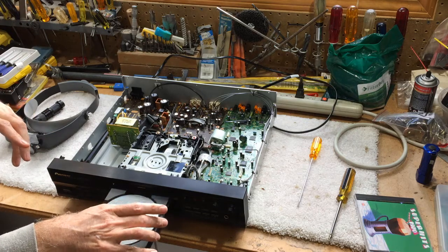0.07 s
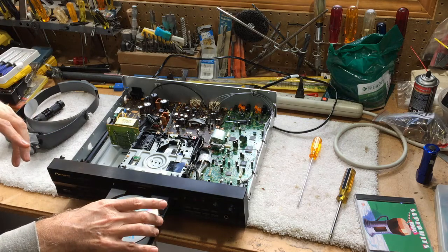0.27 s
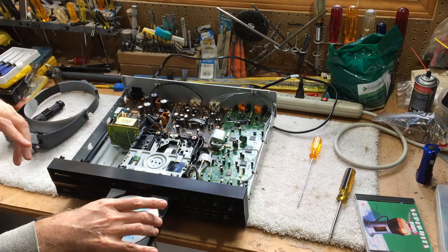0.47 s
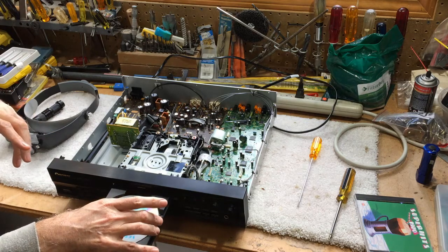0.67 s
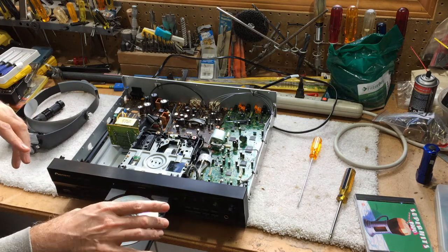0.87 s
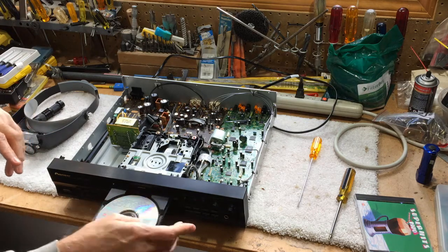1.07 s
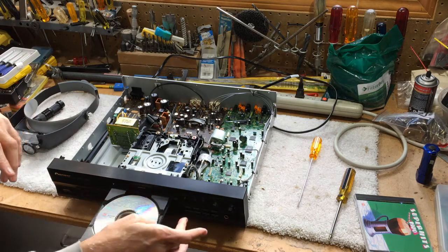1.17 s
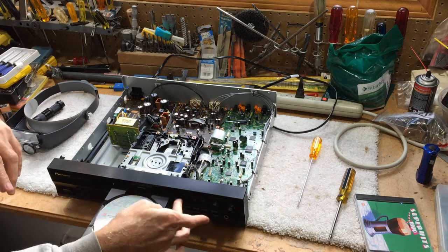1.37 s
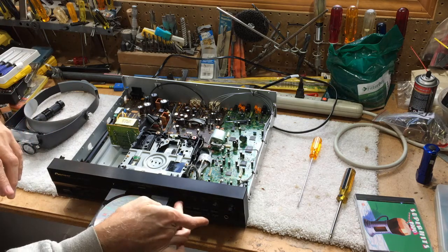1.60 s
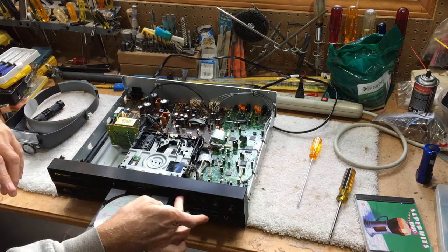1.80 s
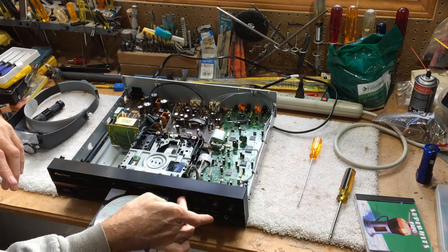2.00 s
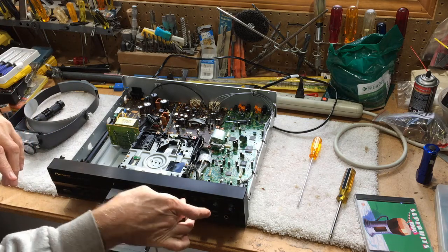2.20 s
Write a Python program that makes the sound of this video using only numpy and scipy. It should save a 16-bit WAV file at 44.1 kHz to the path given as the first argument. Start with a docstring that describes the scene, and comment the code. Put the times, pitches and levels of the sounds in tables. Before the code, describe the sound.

A disc drops into a player's plastic tray with a sharp clatter and is nudged lightly. A hand bumps the case dully, then a button clicks. Heard close in a small, quiet workshop with faint hum.

```python
"""Loading a disc player

A compact disc is set into the plastic tray of an opened player on a workbench: it grazes the rim, drops
in with a sharp clatter and is nudged a few times, each touch exciting its bending modes. A hand bumps
the case, fingers brush the panel and a button clicks. Mains hum and faint hiss fill the small workshop."""
import sys
import numpy as np
from scipy import signal
from scipy.fft import rfft, irfft, next_fast_len
from scipy.io import wavfile

SR = 44100
rng = np.random.default_rng(int(sys.argv[2]) if len(sys.argv) > 2 else 0)


def int16_out(signal):
    """Quantize to a 16-bit WAV file."""
    q = np.round(np.clip(np.atleast_2d(signal).T, -1, 1) * 32767)
    wavfile.write(sys.argv[1], SR, q.astype(np.int16))


N = 99225

# bending modes of the disc: f/Hz, level/dB, T60/s
DISC_MODES = [(252, -17, .25), (672, -8, .22), (970, 0, .18), (1012, -1.5, .2), (1445, -8, .19),
              (2100, -11, .16), (2263, -13, .18), (2316, -13, .19), (2610, -12, .21), (2835, -9, .18),
              (3750, -9, .17), (3905, -9, .17), (4184, -7, .16), (7535, -15, .15)]
DISC_LINEWIDTH_HZ = 3.1  # the disc lies loose in its well, which blurs its modes
# spectrum of rubbing on plastic: f/Hz, relative density/dB
FRICTION_SPECTRUM = [(200, -27), (700, 1), (1300, -3.5), (2700, 1), (4500, -11), (8000, -16), (15000, -31)]


def disc_drop():
    """Impact excitation: the disc skids in, each contact cracks and rattles the tray, the disc rings."""
    # contacts with the tray: t/s, level/dB
    contacts = [(.222, -44), (0.2255, -51), (.2297, -25), (.2362, -38.5), (.2437, -31), (0.268, -37)]
    # spectrum of the plastic rattle: f/Hz, relative density/dB
    rattle_spectrum = [(100, -29), (250, -16.5), (420, -20.5), (800, -10.5), (1150, -9), (1400, -4.5),
                       (1900, -7), (2600, -3), (3100, -8), (3600, -2.5), (4250, 2.5), (4900, -11),
                       (5650, 1), (6700, -4.5), (8200, -8.5), (9700, -8.5), (10600, -18.5), (11500, -12.5),
                       (15500, -15.5)]
    # decay of the rattle: f/Hz, T60/s
    rattle_decay = [(300, 0.25), (2000, 0.22), (6000, 0.078), (14000, 0.12)]
    t = clock()
    until_landing = .2297 - np.arange(N) / SR
    skid_swell = fade(abs(until_landing), t60=.017) * (until_landing > 0)
    out = amp(-33) * noise(rattle_spectrum, N) * skid_swell
    for start, db in contacts:
        crack = amp(-4.5) * noise(rattle_spectrum, len(t)) * fade(t, t60=.0062)
        add(out, start, amp(db) * (crack + burst(rattle_spectrum, rattle_decay)))
    build_up = 1 - np.exp(-t / .018)
    add(out, .2275, amp(-26) * ring(DISC_MODES, DISC_LINEWIDTH_HZ) * build_up)
    return signal.sosfilt(signal.butter(2, 168, "highpass", fs=SR, output="sos"), out)


def disc_grazes():
    """Frictional excitation: grazing swells the disc's modes near one pitch; a fingertip damps them."""
    # grazes on the tray: t/s, rise/s, centre f/Hz, roll-off/(dB/octave), ring level/dB, scrape level/dB
    grazes = [(.001, 0.0025, 1020, 13, -52, -50), (0.097, 0.01, 1050, 11, -42, -60),
              (.122, 0.0038, 1020, 13, -52, -64), (0.206, .015, 1000, 13, -51, -58.5),
              (.355, 0.018, 1020, 20, -49, -61), (.46, 0.016, 1230, 12.5, -44, -62),
              (0.645, 0.0024, 1060, 15, -60, -64), (.655, 0.0074, 658, 40, -48, -67),
              (.83, 0.0095, 970, 20, -58, -71), (.879, 0.0061, 1030, 10, -51, -61.5),
              (.903, 0.0039, 664, 40, -53, -71)]
    out, t = np.zeros(N), clock()
    for start, rise, centre_hz, rolloff, ring_db, scrape_db in grazes:
        modes = [(hz, db - rolloff * abs(np.log2(hz / centre_hz)), t60) for hz, db, t60 in DISC_MODES]
        tone = amp(ring_db) * ring(modes, DISC_LINEWIDTH_HZ) * swell(t, rise, t60=.1)
        scrape = amp(scrape_db) * noise(FRICTION_SPECTRUM, len(t)) * swell(t, rise, t60=.11)
        add(out, start, tone + scrape)
    return out


def hand_bumps():
    """Soft impact: a yielding hand imparts little treble, so the case gives a thud and a dull knock."""
    # blows on the case: t/s, thud level/dB, knock level/dB
    blows = [(1.0014, -40, -39.5), (1.0064, -46.5, -50), (1.0624, -45, -52)]
    # modes of the case: f/Hz, level/dB, T60/s
    case_modes = [(232, -0.5, 0.099), (263.5, 1.5, 0.076), (351, -2.5, 0.039), (728, -9.5, 0.12)]
    # spectrum of the knock: f/Hz, relative density/dB
    knock_spectrum = [(80, -27), (200, -3.5), (500, -2.5), (900, -1), (1450, -3.5), (1850, -9.5),
                      (2400, -31), (5000, -50)]
    # decay of the knock: f/Hz, T60/s
    knock_decay = [(200, 0.21), (1500, 0.11)]
    out, t = np.zeros(N), clock()
    thud = sum(amp(db) * fade(t, t60) * np.sin(2 * np.pi * hz * t) for hz, db, t60 in case_modes)
    for start, thud_db, knock_db in blows:
        knock = burst(knock_spectrum, knock_decay) * (1 - np.exp(-t / .00068))
        add(out, start, amp(thud_db) * thud + amp(knock_db) * knock)
    return signal.sosfilt(signal.butter(4, [149, 2090], "bandpass", fs=SR, output="sos"), out)


def button_click():
    """Impulse response: the button snaps, then bottoms out, and each bright click rings its cap."""
    # snap and end stop: t/s, level/dB
    clicks = [(2.0994, -41), (2.1055, -51)]
    # spectrum of a click: f/Hz, relative density/dB
    snap_spectrum = [(150, -17.5), (900, -22.5), (1800, -14.5), (2250, -7.5), (2900, 3), (3300, -11),
                     (3650, -2.5), (4600, -1.5), (5200, -18), (6400, -21.5), (7300, -10), (8200, -25),
                     (10200, -25), (12200, -10), (15500, -23)]
    # decay of a click: f/Hz, T60/s
    snap_decay = [(500, 0.27), (3000, 0.084), (12000, 0.054)]
    # modes of the cap: f/Hz, level/dB, T60/s
    cap_modes = [(2170, -3, .055), (2770, -1, 0.12), (3030, -1, 0.12), (3600, 3.5, 0.078), (4470, -8, 0.04),
                 (5580, 2.5, .035), (7250, -2, .03)]
    out = np.zeros(N)
    for start, db in clicks:
        snap = burst(snap_spectrum, snap_decay)
        cap = amp(-11) * ring(cap_modes, linewidth_hz=11)
        add(out, start, amp(db) * (snap + cap))
    return out


def finger_brushes():
    """Sliding friction: skin on the plastic front panel makes faint puffs of noise."""
    # touches on the panel: t/s, level/dB
    touches = [(1.845, -64), (2.043, -65.5), (2.09, -61)]
    out, t = np.zeros(N), clock()
    for start, db in touches:
        add(out, start, amp(db) * noise(FRICTION_SPECTRUM, len(t)) * swell(t, rise=.0037, t60=.08))
    return out


def workshop_reverb(x):
    """Reverberation: convolution with a short noise tail gives the cluttered room's diffuse field."""
    # reverberation time: f/Hz, T60/s
    room_decay = [(200, 0.34), (1500, 0.34), (4500, 0.38), (8000, 0.33), (14000, 0.16)]
    tail = burst([(100, .0039), (10000, 0)], room_decay)  # starts almost white
    reflections = signal.fftconvolve(x, tail / np.linalg.norm(tail))
    out = np.zeros(N)
    add(out, start=.012, sound=reflections[:N])
    return out


def background():
    """Line and continuous spectra: steady mains hum over the hiss of quiet room air."""
    # tones of the hum: f/Hz, rms level/dB
    tones = [(120, -66), (240, -84.5), (364, -80.5), (1021, -78)]
    # spectrum of the air: f/Hz, relative density/dB
    air_spectrum = [(20, -34), (35, -21.5), (60, -11.5), (100, -11), (150, -13), (207, -14), (318, -17.5),
                    (488, -18.5), (769, -21.5), (1030, -23), (1600, -24), (4000, -29), (8000, -34),
                    (15000, -39)]
    t = np.arange(N) / SR
    hum = sum(np.sqrt(2) * amp(db) * np.sin(2 * np.pi * (hz * t + rng.random())) for hz, db in tones)
    return hum + amp(-65.5) * noise(air_spectrum, N)


def ring(modes, linewidth_hz):
    """Modal superposition: damped sines of slightly random strength, broadened by phase diffusion."""
    t = clock()
    out = np.zeros(len(t))
    for k, (hz, db, t60) in enumerate(modes):
        gain = (-1) ** k * amp(db + rng.normal())
        drift = np.cumsum(rng.standard_normal(len(t))) * np.sqrt(2 * np.pi * linewidth_hz / SR)
        out += gain * fade(t, t60) * np.sin(2 * np.pi * hz * t + drift)
    return out


def burst(spectrum, decay):
    """Modal overlap: crowded modes merge into noise, each band dying at its own rate."""
    hz, t, bands = signal.stft(noise(spectrum, SR // 2), SR, nperseg=256)
    damped = bands * fade(t, along(decay, hz)[:, None])
    return signal.istft(damped, SR)[1][:SR // 2]


def noise(spectrum, size):
    """Spectral shaping: white noise is coloured, then scaled to rms 1."""
    gain = amp(along(spectrum, np.fft.rfftfreq(size, 1 / SR)))
    coloured = irfft(rfft(rng.standard_normal(size)) * gain, size)
    return coloured / np.sqrt(np.mean(coloured ** 2) + 1e-20)


def swell(t, rise, t60):
    """Linear growth for rise seconds, then free decay."""
    return np.minimum(t / rise, 1) * fade(np.maximum(t - rise, 0), t60)


def fade(t, t60):
    """Exponential decay by 60 dB in t60 seconds."""
    return amp(-60 * t / np.maximum(t60, 1e-3))


def amp(db):
    """Decibels to amplitude ratio."""
    return 10 ** (np.asarray(db) / 20)


def along(points, hz):
    """Interpolation of (f/Hz, value) points on a logarithmic frequency axis."""
    f, values = np.transpose(points)
    return np.interp(np.log(hz + 1), np.log(f + 1), values)


def clock():
    """Time axis of one half-second event."""
    return np.arange(SR // 2) / SR


def add(track, start, sound):
    """Superpose a sound on the track at start seconds."""
    i = max(0, round(start * SR))
    track[i:i + len(sound)] += sound[:N - i]


def scene():
    """Superposition: direct handling sounds, their reverberation and the background, in mono."""
    disc = disc_drop() + disc_grazes()
    thuds = hand_bumps()
    panel = button_click() + finger_brushes()
    reverb = workshop_reverb(amp(-10.5) * disc + amp(-12) * thuds + amp(-16) * panel)
    return (disc + thuds + panel + reverb + background())[None]


def record(dry):
    """Band limiting: an ideal low-pass removes everything above 15.8 kHz."""
    size = next_fast_len(N + SR // 2)
    passband = np.fft.rfftfreq(size, 1 / SR) < 15800
    return irfft(rfft(dry, size) * passband, size)[..., :N]


dry = scene()
out = record(dry)
int16_out(out)
```